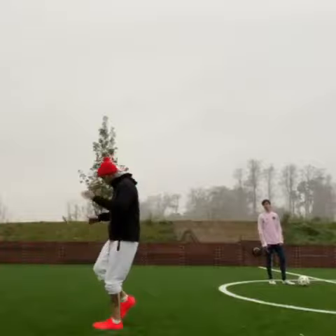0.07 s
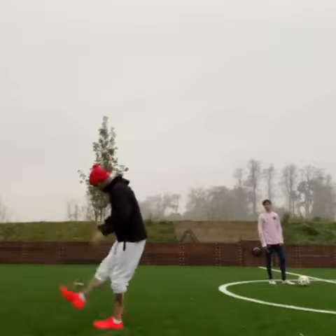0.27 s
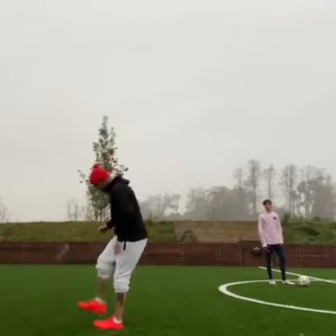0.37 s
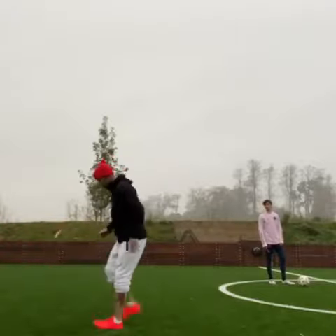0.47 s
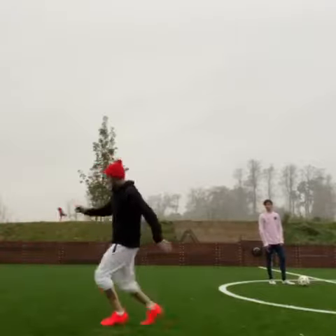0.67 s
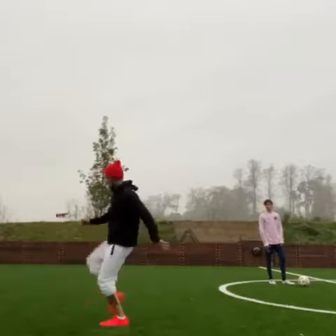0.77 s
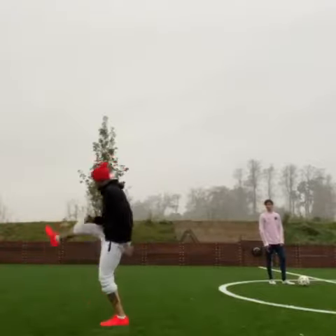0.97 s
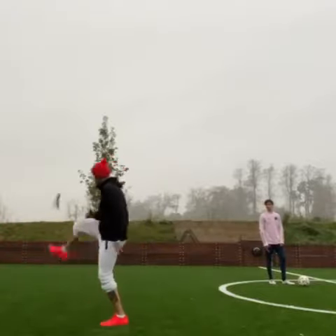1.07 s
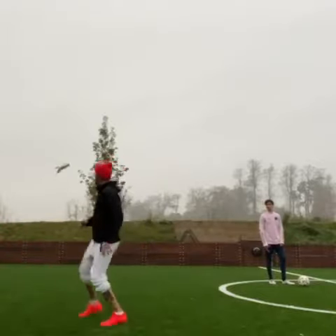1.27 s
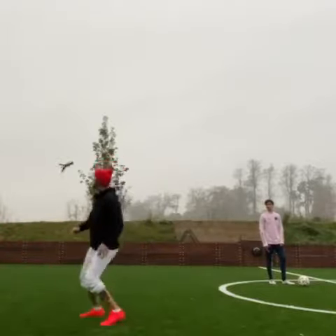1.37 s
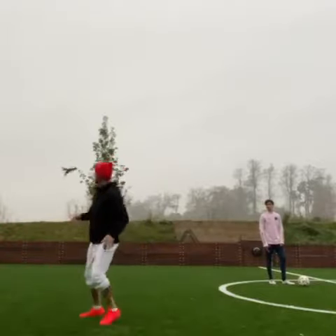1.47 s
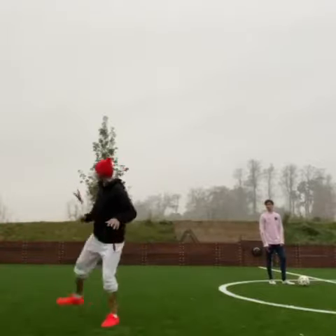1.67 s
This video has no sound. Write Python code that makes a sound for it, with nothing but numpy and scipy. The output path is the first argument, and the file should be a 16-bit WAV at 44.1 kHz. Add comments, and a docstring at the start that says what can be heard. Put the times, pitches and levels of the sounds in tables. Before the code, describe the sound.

A feathered shuttlecock is kicked twice, each hit a sharp, bright clack trailed by thin echoes. Feet thud softly and scuff artificial turf after each kick, heard from nearby on an outdoor pitch over a faint low rumble.

```python
"""On an artificial-turf pitch, a feathered shuttlecock is kicked up twice.
Its stacked discs slap together on the shoe and ring briefly, making a clack.
Fences and walls throw back a string of thin echoes. The feet come down with soft thuds
and scuff the plastic grass, over a low outdoor rumble and a faint hiss."""
import sys
import numpy as np
from scipy import signal
from scipy.fft import rfft, irfft
from scipy.io import wavfile
from scipy.ndimage import uniform_filter1d

SR = 44100
rng = np.random.default_rng(int(sys.argv[2]) if len(sys.argv) > 2 else 0)


def waveform_to_disk(signal):
    """Save audio, clipped to [-1, 1], as 16-bit WAV at the path in sys.argv[1]."""
    frames = np.transpose(np.atleast_2d(signal))
    scaled = np.clip(frames, -1, 1) * 32767
    samples = np.round(scaled).astype(np.int16)
    wavfile.write(sys.argv[1], SR, samples)


N = 74970
TIME = np.arange(N) / SR
LEFT_RIGHT = np.array([[1], [-1]])  # adds a sound to one ear and takes it from the other
# when the shoe hits the shuttlecock: (time [s])
KICK_TIMES = [.1294, .8185]


def from_db(db):
    """Turn decibels into a number to multiply a sound by."""
    return 10 ** (np.asarray(db) / 20)


def coloured(x, colour):
    """Make some pitches louder and others softer, following a colour: (pitch [Hz], level [dB])."""
    hz, db = np.transpose(colour)
    bins = np.maximum(np.fft.rfftfreq(N, 1 / SR), 1)
    gain = from_db(np.interp(np.log(bins), np.log(hz), db))
    return irfft(rfft(x) * gain, N)


def noise(colour):
    """Noise of the given colour, always brought to the same strength."""
    x = coloured(rng.standard_normal(N), colour)
    return x / x.std()


def wide_noise(colour, side_db=0):
    """Noise that is alike in both ears in the bass and wider above; side_db widens it further."""
    # how much the two ears differ: (pitch [Hz], level [dB])
    width = [(60, -14), (200, -11), (400, -8), (1000, -2), (2500, -6), (10000, -6)]
    side = from_db(side_db) * coloured(noise(colour), width)
    return noise(colour) + side * LEFT_RIGHT


def burst(start, rise, fade):
    """A loudness shape that grows for `rise` seconds, then drops 60 dB every `fade` seconds."""
    age = TIME - start
    return np.clip(age / rise, 0, 1) ** 2 * np.exp(-np.log(1000) * np.maximum(age - rise, 0) / fade)


def ring(start, hz, rise, fade):
    """One pure tone that is struck and dies away."""
    return burst(start, rise, fade) * np.sin(2 * np.pi * hz * (TIME - start))


def wavering(x, swing_db=2.2, swings_per_s=9):
    """Let each octave of a sound swell and sink at random."""
    octaves_hz = 125 * 2 ** np.arange(8)
    turn_times = np.arange(0, TIME[-1] + 1, 1 / swings_per_s)
    swings = swing_db * rng.standard_normal((len(octaves_hz), len(turn_times)))
    pitch = np.log(np.maximum(np.fft.rfftfreq(N, 1 / SR), 1))
    out = 0
    for one_octave, db in zip(np.eye(len(octaves_hz)), swings):
        band = irfft(rfft(x) * np.interp(pitch, np.log(octaves_hz), one_octave), N)
        out = out + band * from_db(np.interp(TIME, turn_times, db))
    return out


def background():
    """A low outdoor rumble rises and falls under a faint, wavering, far-off hiss."""
    # colour of the rumble: (pitch [Hz], level [dB])
    rumble_colour = [(20, -29), (35, -15), (55, -1), (75, 2.5), (110, -4), (180, -15), (280, -24.5),
                     (450, -39), (900, -61), (2000, -81)]
    # its ups and downs, which are made smaller below: (time [s], level [dB])
    rumble_shape = [(0.0, -56), (0.104, -67), (0.146, -47.5), (0.212, -54), (0.814, -59.5), (0.866, -47.5),
                    (0.928, -61.5), (1.254, -50.5), (1.344, -67.5), (1.504, -53.5), (1.566, -66),
                    (1.7, -57)]
    # colour of the hiss: (pitch [Hz], level [dB])
    hiss_colour = [(200, -6.5), (450, -10), (650, -8), (1050, 1.5), (1600, -16), (3000, -18), (7000, -24),
                   (11500, -27.5), (13000, -36)]
    level = np.interp(TIME, *np.transpose(rumble_shape))
    swell_db = 0.57 * (level - level.mean())
    rumble = from_db(-57 + swell_db) * wide_noise(rumble_colour)
    hiss = from_db(-78) * wavering(wide_noise(hiss_colour, side_db=3.5))
    return rumble + hiss


def thuds():
    """The shoe knocks dully on the shuttlecock or the ground."""
    # the knocks: (time [s], level [dB], pitch [Hz], fade [s])
    knocks = [(0.132, -40.5, 310, 0.055), (0.1321, -44, 483, 0.052), (.1420, -40.5, 86.6, 0.11),
              (.1430, -49.5, 165, 0.054), (0.192, -56.5, 279.7, 0.1), (.4140, -34.5, 263, 0.031),
              (0.487, -45, 97.7, .2), (0.8181, -51.5, 249.4, 0.043), (0.8183, -53.5, 445, 0.041),
              (.8185, -46.5, 740, 0.026), (0.861, -46.5, 88, 0.13), (1.1464, -47, 508, 0.049),
              (1.1500, -41.5, 285, 0.042), (1.151, -39.5, 167.7, 0.11), (1.1530, -42, 71.3, 0.32),
              (1.2300, -43, 81.7, 0.09)]
    return sum(from_db(db) * ring(start, hz, rise=0.0013, fade=fade) for start, db, hz, fade in knocks)


def scuffs():
    """Soles press dully on the turf and brush its plastic blades, which crackle."""
    # foot movements: (time [s], level [dB], rise [s], fade [s], extra crackle [dB])
    steps = [(0.379, -48.5, 0.029, 0.23, 1), (.435, -62, 0.034, 0.84, 4.5), (0.531, -61, 0.0085, 0.27, 0.5),
             (0.551, -59.5, 0.036, 0.16, 9), (1.1398, -46.5, 0.0053, 0.092, 3),
             (1.163, -53, 0.0088, 0.25, 3.5), (1.271, -66, 0.021, 0.27, -10),
             (1.364, -54.5, 0.046, 0.26, -5.5)]
    # colour of the pressing sole: (pitch [Hz], level [dB])
    sole_colour = [(60, -2), (150, 4.5), (280, -0.5), (500, -4.5), (750, -12), (1200, -12.5), (2000, -29),
                   (4000, -47)]
    # colour of the plastic grass: (pitch [Hz], level [dB])
    grass_colour = [(400, -7), (700, 4), (1150, 3.5), (2000, -2.5), (3000, -9), (7000, -4.5), (8700, -18),
                    (11500, -5.5), (12500, -40)]
    press = brush = 0
    for start, db, rise, fade, crackle_db in steps:
        step = from_db(db) * burst(start, rise, fade)
        press = press + step
        brush = brush + from_db(crackle_db) * step
    grain = uniform_filter1d(rng.standard_normal(N), size=40)  # a fast flicker in loudness
    blades = from_db(-14 + 1.5 * grain / grain.std()) * wide_noise(grass_colour, side_db=-1)
    return press * wide_noise(sole_colour, side_db=-10.5) + brush * blades


def tail(kick, delay_s=0.004, rise_s=0.0024):
    """Reflections from around the pitch blur into a fading wash, in which a few disc tones linger."""
    # the wash, one row a kick: (near level [dB], near fade [s], far level [dB], far fade [s])
    washes = [(-49, 0.16, -53.5, 0.76), (-54.5, 0.278, -57, .8)]
    # colour of the wash: (pitch [Hz], level [dB])
    wash_colour = [(200, -9.5), (700, -10), (1500, -6.5), (2500, 0), (5000, -0.5), (7700, 5), (8700, -7.5),
                   (10400, 2), (11900, -3.5), (12700, -26)]
    # lingering tones: (pitch [Hz], fade [s], level in kick 1 [dB], level in kick 2 [dB])
    lingering = [(3720, .25, -66, -62), (4480, .25, -68, -60), (6750, .25, -56, -68), (7260, .25, -56, -70),
                 (10370, .2, -62, -59), (11198, .27, -64, -51)]
    near_db, near_fade, far_db, far_fade = washes[kick]
    start = KICK_TIMES[kick] + delay_s
    near = from_db(near_db) * burst(start, rise_s, near_fade)
    far = from_db(far_db) * burst(start, rise_s, far_fade)
    tones = sum(from_db(db[kick]) * ring(start, hz, rise_s, fade) for hz, fade, *db in lingering)
    return (near + far) * wide_noise(wash_colour) + tones


def echoes(kick, boost_db=8.5, boost_octaves=0.3):
    """Each fence or wall throws back a thin tick with a colour of its own."""
    # the echoes, one list a kick: (delay [s], level [dB], boosted pitch [Hz])
    bounces = [
        [(.0578, -45, 6000), (.0655, -36.5, 6900), (.0710, -47, 4500), (.0930, -41, 7400), (.0980, -51, 4200),
         (.1160, -52.5, 7600), (.1555, -58, 7400), (.1750, -53, 4500), (.2065, -61, 5000)],
        [(.0555, -41.5, 2150), (.0605, -41, 2250), (.0882, -42.5, 3400), (.0928, -48, 3400),
         (.1146, -45.5, 3800), (.1366, -50, 4700), (.1556, -59, 7000), (.1700, -56.5, 3600), (.1848, -56, 7500),
         (.1996, -54.5, 3000), (.2036, -56.5, 3000), (.2126, -62, 6000), (.2590, -66, 6500),
         (.2795, -61.5, 7600)],
    ]
    # colour that all echoes share: (pitch [Hz], level [dB])
    echo_colour = [(500, -35), (1500, -21), (2100, -2), (2700, -5.5), (3600, -1), (7700, -1.5), (8700, -13),
                   (10500, 1.5), (12000, -18), (12700, -50)]
    hz = np.geomspace(300, 15000, 60)
    colour_hz, colour_db = np.transpose(echo_colour)
    shared_db = np.interp(np.log(hz), np.log(colour_hz), colour_db)
    out = 0
    for delay, db, boosted_hz in bounces[kick]:
        boost = boost_db * np.exp(-(np.log2(hz / boosted_hz) / boost_octaves) ** 2)
        loudness = from_db(db) * burst(KICK_TIMES[kick] + delay, rise=0.003, fade=0.018)
        out = out + loudness * noise(np.c_[hz, shared_db + boost])
    return out


def disc_ring(kick):
    """The struck discs ring for a moment; each kick stirs a different mix of their tones."""
    # tones of the stack: (pitch [Hz], fade [s], level in kick 1 [dB], level in kick 2 [dB])
    tones = [(1150, .015, -47, -32), (1435, 0.017, -43.5, -58), (1930, 0.014, -30.5, -49.5),
             (2089, 0.014, -43, -23), (2740, .008, -44, -34), (3313, .007, -43, -26),
             (3780, 0.0087, -30.5, -30), (4510, 0.013, -32.5, -27), (6345, 0.013, -36, -29.5),
             (7883, 0.012, -17.5, -33), (8053, .012, -26.5, -37.5), (9420, .014, -39, -36),
             (10130, .014, -34, -30), (11230, .026, -41, -30)]
    start = KICK_TIMES[kick]
    return sum(from_db(db[kick]) * ring(start, hz, rise=0.00057, fade=fade) for hz, fade, *db in tones)


def disc_slaps(kick, side_db=-16):
    """The discs slap together a few times: short, rough touches, coloured by the stack."""
    # the slaps, one list a kick: (time [s], level [dB], rise [s], fade [s])
    slaps = [
        [(.1290, -29.5, 0.0018, 0.011), (.1318, -27.5, 0.00064, 0.009), (.1340, -30.5, 0.00053, 0.0051),
         (.1358, -21, 0.00012, 0.0022), (.1368, -38.5, 0.00065, 0.016), (.1440, -36, 0.0038, 0.035)],
        [(.8155, -32, 0.0028, 0.014), (.8191, -24.5, 0.0003, 0.005), (.8296, -44.5, .0006, 0.0098)],
    ]
    # colour of the stack: (pitch [Hz], level in kick 1 [dB], level in kick 2 [dB])
    stack_colour = [(199.5, -10, -9), (480, -10.5, -13.5), (650, -25.5, -11.5), (1020, -24.5, -14),
                    (1206, 3.5, -8), (2010, 1, -2), (2677, -8, 4.5), (3850, 3, 5), (5895, 1, 3),
                    (8700, 5, -5), (11090, 5.5, 5.5), (13100, -19, -17.5)]
    colour = [(hz, db[kick]) for hz, *db in stack_colour]
    force = sum(from_db(db) * burst(start, rise, fade) for start, db, rise, fade in slaps[kick])
    middle, side = rng.choice([-1, 1], (2, N))
    roughness = middle + from_db(side_db) * side * LEFT_RIGHT
    return coloured(force * roughness, colour) / coloured(middle, colour).std()


def scene():
    """Two kicks with their echoes, the footwork and the outdoor background."""
    kicks = sum(disc_ring(k) + disc_slaps(k) + echoes(k) + tail(k) for k in range(len(KICK_TIMES)))
    return kicks + thuds() + scuffs() + background()


def record(dry):
    """Cut the highest treble: from about 14 kHz up it is at least 50 dB softer."""
    treble_cut = signal.cheby2(16, 50, 13964, fs=SR, output="sos")
    return signal.sosfilt(treble_cut, dry)


dry = scene()
out = record(dry)
waveform_to_disk(out)
```